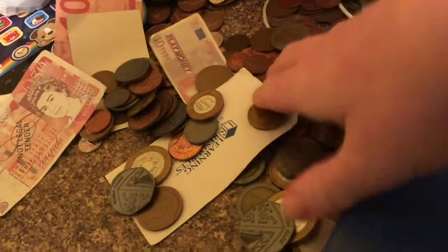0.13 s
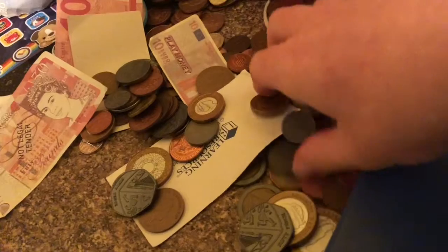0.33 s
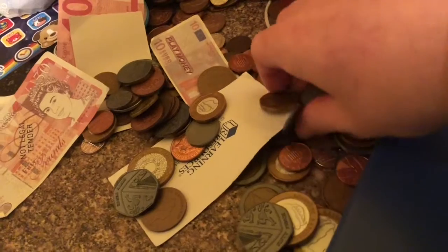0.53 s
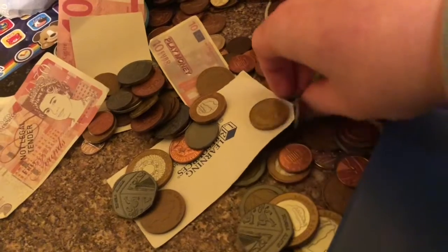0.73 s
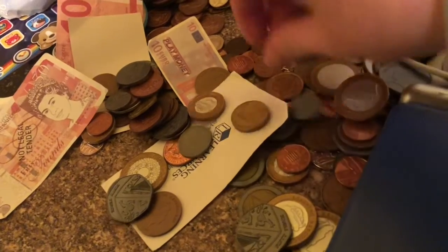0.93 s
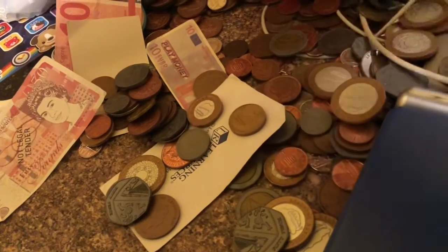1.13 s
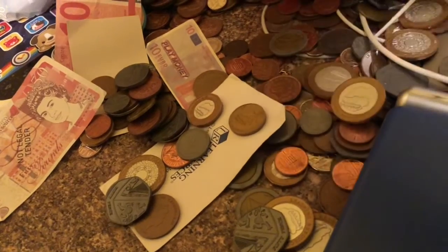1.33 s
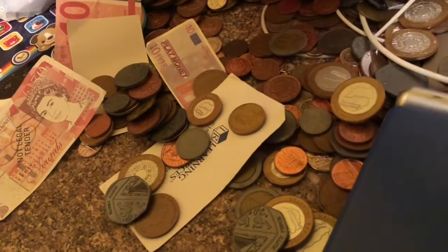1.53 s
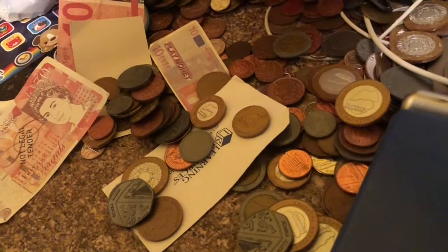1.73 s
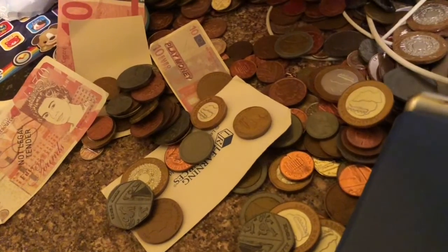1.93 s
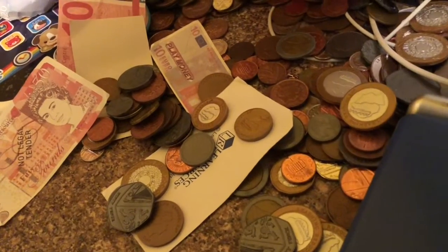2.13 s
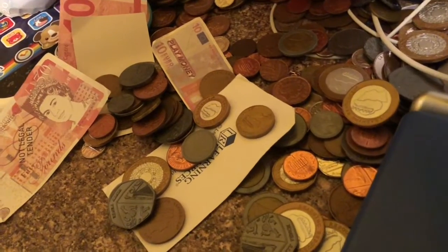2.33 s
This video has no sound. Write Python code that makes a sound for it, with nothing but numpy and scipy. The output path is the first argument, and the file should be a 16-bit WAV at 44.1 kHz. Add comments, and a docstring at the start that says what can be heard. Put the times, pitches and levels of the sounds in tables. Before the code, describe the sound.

Loose coins clatter and scrape under a moving hand, settle with a quick chatter, then a table knock

```python
"""Raked coins, then table sounds

A hand rakes through a heap of coins on a table, with a small metal object among them; one coin chatters
to rest. After a pause come knocks on the wood, a soft rustle swelling at 2.2 s, small taps nearby and
two late clinks, in a quiet furnished room with a faint whine. Metal, table and hollow object are
decaying sine modes with noise bursts; the rake is hiss, grains and rumble; the room is decaying noise
convolved with the sources; the air is steady coloured noise."""
import sys
import numpy as np
from scipy import signal
from scipy.fft import rfft, irfft, next_fast_len
from scipy.io import wavfile
from scipy.ndimage import map_coordinates

SR = 44100
rng = np.random.default_rng(int(sys.argv[2]) if len(sys.argv) > 2 else 0)


def wrap_up_sound(samples):
    """Save the sound to the file named by the first command line argument, as 16-bit audio."""
    columns = np.atleast_2d(samples).T
    # keep every value between -1 and 1, then stretch to whole-number steps
    tamed = np.clip(columns, -1, 1)
    steps = np.round(tamed * 32767).astype(np.int16)
    wavfile.write(sys.argv[1], SR, steps)


N = 110250
T_S = np.arange(SR // 2) / SR  # time within one event
SCENE_T_S = np.arange(N) / SR

# Metal contacts. Each row: start in seconds, letter of the coin or object, click level in dB,
# levels of its three modes in dB (three columns), mode t60 in seconds.
METAL_CONTACTS = [(0, "c", -69, -77, -68, -90, 0.25), (0.16, "c", -22, -33, -49, -28.5, 0.025),
                  (.2, "a", -19.5, -50, -29, -28, 0.043), (0.28, "e", -27, -42, -20.5, -46, 0.057),
                  (.373, "a", -33.5, -54, -34, -46.5, 0.037), (.389, "c", -27, -35, -57.5, -34.5, 0.097),
                  (0.421, "e", -21, -56.5, -36, -43.5, 0.027), (0.45, "d", -16, -26.5, -35.5, -29, 0.076),
                  (.472, "a", -25.5, -35.5, -31.5, -31.5, 0.14), (0.482, "d", -20, -36, -45, -18.5, 0.073),
                  (.51, "a", -26, -36, -40.5, -35, .12), (.552, "a", -32, -52.5, -27, -32.5, 0.016),
                  (0.5794, "b", -25.5, -45.5, -36, -34.5, 0.026),
                  (0.5819, "b", -11.5, -53, -40.5, -13.5, 0.021),
                  (0.6014, "h", -19, -23.5, -30.5, -29.5, 0.013), (0.61, "h", -30, -35, -36.5, -41.5, .03),
                  (0.6682, "d", -27, -33.5, -50, -50, 0.027), (0.6765, "a", -30, -54, -34, -40.5, 0.024),
                  (.696, "c", -22, -25.5, -21.5, -13.5, 0.044), (0.75, "c", -27.5, -34.5, -45, -46, 0.027),
                  (0.7987, "c", -25, -46.5, -42.5, -31.5, 0.075),
                  (0.853, "b", -38.5, -41.5, -58.5, -61.5, 0.073),
                  (0.899, "f", -24.5, -47, -40.5, -47.5, .025), (.918, "b", -23.5, -33.5, -35, -50.5, 0.13),
                  (.926, "c", -20.5, -27.5, -42, -28, 0.044), (0.9678, "a", -12.5, -44, -20, -20.5, 0.034),
                  (0.983, "b", -21, -47.5, -24, -47, 0.048), (1.005, "a", -19, -33.5, -38.5, -28, 0.0529),
                  (1.028, "e", -20.5, -38, -3.5, -32.5, 0.036),
                  (1.033, "e", -23.5, -47.5, -16.5, -23, 0.043),
                  (1.035, "g", -44.5, -18.5, -58, -66, 0.028),
                  (1.0606, "e", -31, -47.5, -9.5, -38, 0.02867), (1.0915, "e", -27, -34, -12.5, -23, 0.023),
                  (1.106, "e", -31, -35, -16, -45.5, 0.031), (1.134, "e", -52, -54, -38, -60, 0.054),
                  (2.279, "h", -31, -39, -41, -36, 0.023), (2.477, "a", -41, -60, -49.5, -59, 0.11)]
# Clearest modes of each coin, and of a small metal object (h), perhaps a key or clip.
# Each entry: letter, then three frequencies in Hz.
METAL_MODES_HZ = dict(a=(3447, 5935, 7975), b=(4560, 7985, 10730), c=(5630, 9800, 12920),
                  d=(6350, 10950, 14660), e=(6697, 11488, 15320), f=(5270, 9090, 12050),
                  g=(7190, 12400, 16400), h=(2850, 3600, 5512))
# Colour of the metal click. Each row: frequency in Hz, relative level in dB.
METAL_CLICK_COLOUR = [(300, -36.5), (2200, -8), (5000, 3.5), (11000, 3.5), (16000, -1)]
# Hand in the heap. Each row: time in seconds, relative scrape level in dB, table rumble level in dB.
RAKE_LEVELS = [(0, -75, -52.5), (0.146, -94.5, -77), (0.157, -45, -52), (0.226, -48, -38.5),
               (0.271, -59, -47), (.35, -59, -55), (.41, -50.5, -45.5), (0.446, -52.5, -48),
               (.455, -40.5, -39), (0.531, -48, -44.5), (.65, -56.5, -50), (0.702, -46, -45.5),
               (.775, -47.5, -45), (0.816, -47.5, -39), (.84, -54.5, -45.5), (0.889, -52.5, -55),
               (0.931, -48, -38.5), (0.959, -54, -46.5), (0.973, -44.5, -42), (1.05, -50.5, -50),
               (1.15, -63.5, -55.5), (1.25, -87, -77)]
# Colour of the sliding hiss. Each row: frequency in Hz, relative density in dB per Hz.
SCRAPE_COLOUR = [(300, -29), (550, 2.5), (1500, -0.5), (6000, -6), (13000, -11.5), (16500, -19)]
# Colour of the table rumble. Each row: frequency in Hz, relative density in dB per Hz.
RUMBLE_COLOUR = [(30, -53.5), (60, -27), (119, -1), (205, -18.5), (260, -1), (500, -14.5), (714, -6.5),
                 (1500, -22.5), (3000, -68)]
# Knocks on the table, and a soft rustle swelling at 2.2 s. Each row: start in seconds,
# mode level in dB, noise level in dB, noise rise time constant in ms.
TABLE_EVENTS = [(1.728, -27.5, -30, 0.7), (1.74, -28.5, -20.5, 0.51), (1.917, -50.5, -44, 2.6),
                (2.2, -86, -49, 72), (2.26, -41, -43, 8.9)]
# Modes of the wooden table. Each row: frequency in Hz, relative level in dB, t60 in seconds.
TABLE_MODES = [(156.1, -7, 0.25), (273.5, 1.5, 0.12), (351.8, -5, 0.19), (464, 1.5, 0.086),
               (874, -7.5, 0.081), (1048, -9.5, 0.17), (1523, -10, 0.023)]
# Colour of the noise in table events and taps. Each row: frequency in Hz, relative level in dB.
BURST_COLOUR = [(100, -2), (400, 2.5), (1500, -1), (5000, -11), (16000, -33.5)]
# Taps on a small hollow object. Each row: start in seconds, ring level in dB, click level in dB.
HOLLOW_TAPS = [(1.8876, -58, -46), (1.954, -55, -49.5), (2.0094, -57.5, -49.5), (2.208, -58.5, -50.5),
               (2.386, -43.5, -42.5), (2.412, -55, -40.5), (2.447, -48, -42.5), (2.476, -60, -39),
               (2.496, -60, -37.5)]
# Modes of the hollow object. Each row: frequency in Hz, relative level in dB, t60 in seconds.
HOLLOW_MODES = [(657, 2, 0.2), (1177, 10.5, 0.037), (1890, 14, 0.026)]
# Room decay. Each row: frequency in Hz, t60 in seconds.
ROOM_DECAY = [(150, 0.95), (5000, 0.5), (14000, 0.24)]
# Faint far whine. Single row: start in seconds, stop in seconds, frequency in Hz, level in dB.
FAR_WHINE = (1.6, 2.4, 2800, -76.5)
# Colour of the room air. Each row: frequency in Hz, relative density in dB per Hz.
AIR_COLOUR = [(20, -29), (50, 1), (103, -9.5), (163, -5), (215, -17.5), (339, -11), (952, -17),
              (1730, -28.5), (3000, -30.5), (16500, -44)]

CLICK_T60_S, SKID_DB, SKID_T60_S = 0.005, -13, 0.057  # skid relative to click
AFTER_DB, AFTER_T60_AT_10KHZ_S = -31, 0.27  # faint longer ring, relative to its mode
WAVER_DB, WAVER_KNOTS_PER_S = 3, 270  # contact makes the ring waver
NEIGHBOUR_DB, NEIGHBOUR_T60_S, SNAP_DB = -13, 0.021, 9.5  # dB relative to click; t60 scaled at random
GRAINS_PER_S, GRAIN_SPREAD_DB, GRAIN_DB = 600, 5, 0.5  # mean rate; GRAIN_DB relative to hiss
GRAIN_RING_TAU_S, GRAIN_TICK_TAU_S = .0022, 0.0002735
RATTLE_DB, RATTLE_T60_S = -27.5, 0.21  # loose things on the table, relative to the noise level
COIN_ROOM_DB, WOOD_ROOM_DB, AIR_DB = -14.5, -10.5, -60
TOP_HZ = 16000


def amp(db):
    """dB to gain."""
    return 10 ** (np.asarray(db) / 20)


def unit(x):
    """Scaled to rms 1."""
    return x / np.sqrt(np.mean(x ** 2) + 1e-20)


def along(points, hz):
    """(Hz, value) points interpolated on a log frequency axis."""
    point_hz, value = np.transpose(points)
    return np.interp(np.log(hz + 1), np.log(point_hz + 1), value)


def filtered(x, response):
    """x times a response of frequency."""
    size = next_fast_len(N + 8192)
    return irfft(rfft(x, size) * response(np.fft.rfftfreq(size, 1 / SR)), size)[:N]


def noise(colour):
    """Coloured noise of rms 1."""
    return unit(filtered(rng.standard_normal(N), lambda hz: amp(along(colour, hz))))


def puffs(envelope, colour):
    """Noise under an envelope, then coloured; the colour has unit power."""
    return filtered(envelope * rng.standard_normal(N), lambda hz: unit(amp(along(colour, hz))))


def wobble(knots_per_s, size=N):
    """Smooth random curve through normally distributed knots."""
    knots = rng.standard_normal(int(size * knots_per_s / SR) + 4)
    return map_coordinates(knots, [np.arange(size) * knots_per_s / SR])


def fall(t60_s):
    """Decay of 60 dB in t60, 2 ms at least."""
    return amp(-60 * T_S / max(t60_s, .002))


def sine(hz):
    """Sine over one event."""
    return np.sin(2 * np.pi * hz * T_S)


def add(out, start_s, sound):
    """Mixes a sound in at a time."""
    part = out[max(round(start_s * SR), 0):][:len(sound)]
    part += sound[:len(part)]


def metal_modes(letter, mode_dbs, t60_s):
    """Modes of one coin or object, each wavering on its own, with a main decay and a faint longer one."""
    total = 0
    for hz, db in zip(METAL_MODES_HZ[letter], mode_dbs):
        level = amp(db + WAVER_DB * wobble(WAVER_KNOTS_PER_S, size=len(T_S)))
        decay = fall(t60_s) + amp(AFTER_DB) * fall(AFTER_T60_AT_10KHZ_S * 10000 / hz)
        total = total + level * sine(hz) * decay
    return total


def neighbours():
    """Neighbouring coins: 14 brief modes of random level, pitch and decay."""
    total = 0
    for a, b, c in rng.random((14, 3)):
        total = total + amp(NEIGHBOUR_DB - 12 * a) * sine(2500 * 6 ** b) * fall(NEIGHBOUR_T60_S * (.3 + c))
    return total


def clinks():
    """Each contact snaps (impulse), clicks and skids (noise), and rings its metal and the neighbours."""
    ring, burst, snap = np.zeros(N), np.zeros(N), np.zeros(N)
    attack = 1 - np.exp(-T_S / 0.0005)
    click_shape = fall(CLICK_T60_S) + amp(SKID_DB) * fall(SKID_T60_S)
    for start_s, letter, click_db, *mode_dbs, t60_s in METAL_CONTACTS:
        tone = metal_modes(letter, mode_dbs, t60_s) + amp(click_db) * neighbours()
        add(ring, start_s, tone * attack)
        add(burst, start_s, amp(click_db) * click_shape)
        add(snap, start_s, amp([click_db + SNAP_DB]))
    snap = filtered(snap, lambda hz: unit(amp(along(METAL_CLICK_COLOUR, hz))))
    return ring + puffs(burst, METAL_CLICK_COLOUR) + snap


def grains():
    """Tiny coin contacts at random times: a noise tick and two decaying sines of random pitch; rms 1."""
    draw = rng.random((3000, 5))
    on = draw[:, 1] < GRAINS_PER_S * N / SR / len(draw)
    k = np.arange(300)  # samples within a grain
    hz = 2200 * 6.5 ** draw[:, 2:4]
    ring = draw[:, 4:] * np.sin(2 * np.pi * hz[..., None] * k / SR).sum(axis=1)
    ring = ring * np.exp(-k / SR / GRAIN_RING_TAU_S)
    tick = rng.standard_normal(ring.shape) * np.exp(-k / SR / GRAIN_TICK_TAU_S)
    size = amp(GRAIN_SPREAD_DB * rng.exponential(size=(len(draw), 1)).clip(0, 3.5))
    at = (draw[:, :1] * N).astype(int) + k
    train = np.bincount(at[on].ravel(), (size * (ring + tick))[on].ravel(), 2 * N)[:N]
    return unit(filtered(train, lambda hz: amp(along(METAL_CLICK_COLOUR, hz))))


def rake():
    """Sliding coins: hiss and grains under one fluctuating level, plus a rumble in the table."""
    time_s, scrape_db, rumble_db = np.transpose(RAKE_LEVELS)
    scrape_db = np.interp(SCENE_T_S, time_s, scrape_db, right=-120) + 7.5 + 3.43 * wobble(110)
    rumble_db = np.interp(SCENE_T_S, time_s, rumble_db, right=-120)
    scrape = amp(scrape_db) * (noise(SCRAPE_COLOUR) + amp(GRAIN_DB) * grains())
    return scrape + amp(rumble_db) * noise(RUMBLE_COLOUR)


def excited(events, modes, burst_t60_s):
    """Each event rings wavering modes under a noise burst and rattle; a slow rise prolongs the burst."""
    ring, burst = np.zeros(N), np.zeros(N)
    attack = 1 - np.exp(-T_S / 0.0031)
    rattle = amp(RATTLE_DB) * fall(RATTLE_T60_S)
    for start_s, ring_db, burst_db, rise_ms in events:
        tone = 0
        for hz, db, t60_s in modes:
            tone = tone + amp(db + 3 * wobble(60, size=len(T_S))) * fall(t60_s) * sine(hz)
        rise = 1 - np.exp(-1000 * T_S / max(rise_ms, .1))
        main = fall(burst_t60_s + rise_ms / 100)
        add(ring, start_s, amp(ring_db) * tone * attack)
        add(burst, start_s, amp(burst_db) * (main + rattle) * rise)
    return ring + puffs(burst, BURST_COLOUR)


def table_sounds():
    """Knocks ring the wooden table; the rustle is a slowly rising noise with almost no ring."""
    return excited(TABLE_EVENTS, TABLE_MODES, 0.028)


def taps():
    """Small taps excite the modes of a hollow object, all with a 1 ms click rise."""
    return excited([(*tap, 1) for tap in HOLLOW_TAPS], HOLLOW_MODES, 0.053)


def room(x):
    """Reverberation: convolution with noise whose bands each die at their own speed."""
    hz, t_s, bands = signal.stft(rng.standard_normal(SR // 2), SR, nperseg=256)
    decay = amp(-60 * t_s / along(ROOM_DECAY, hz)[:, None])
    tail = signal.istft(bands * decay, SR, nperseg=256)[1]
    delayed = np.pad(x, (200, 0))  # samples
    return signal.fftconvolve(delayed, tail / np.linalg.norm(tail))[:N]


def whine():
    """Thin sine of unsteady level inside a faint hiss centred on its pitch, faded in and out."""
    start_s, stop_s, whine_hz, db = FAR_WHINE
    tone = amp(3 * wobble(150)) * np.sin(2 * np.pi * whine_hz * SCENE_T_S)
    hiss = unit(filtered(rng.standard_normal(N), lambda hz: 1 / (1 + ((hz - whine_hz) / 1200) ** 2)))
    fade = np.clip(np.minimum(SCENE_T_S - start_s, stop_s - SCENE_T_S) * 20, 0, 1)
    return fade * amp(db) * (tone + hiss)


def air():
    """Steady coloured noise of the room air."""
    return amp(AIR_DB) * noise(AIR_COLOUR)


def scene():
    """Metal and table sounds, their reverberation, the whine and the air."""
    metal = clinks() + rake()
    table = table_sounds() + taps()
    wet = room(amp(COIN_ROOM_DB) * metal + amp(WOOD_ROOM_DB) * table)
    return (metal + table + wet + whine() + air())[None]


def record(dry):
    """The microphone drops the deepest bass and keeps nothing above its band limit."""
    def response(hz):
        bass_cut = hz ** 4 / (hz ** 4 + 40 ** 4)
        return bass_cut / (1 + (hz / TOP_HZ) ** 60) * (hz < 17000)
    return filtered(dry[0], response)[None]


dry = scene()
out = record(dry)
wrap_up_sound(out)
```